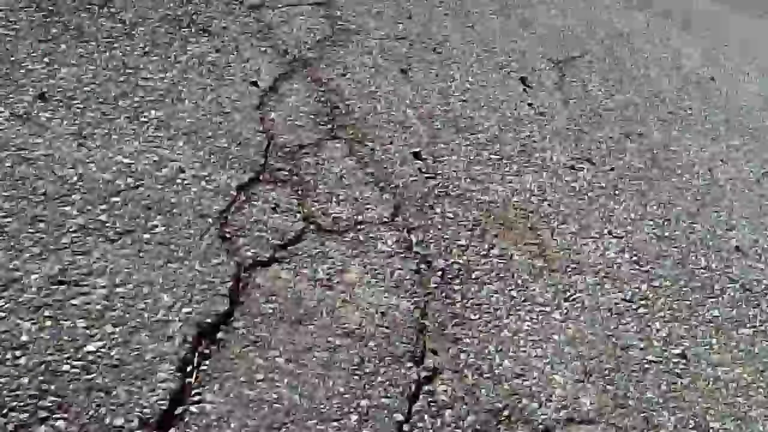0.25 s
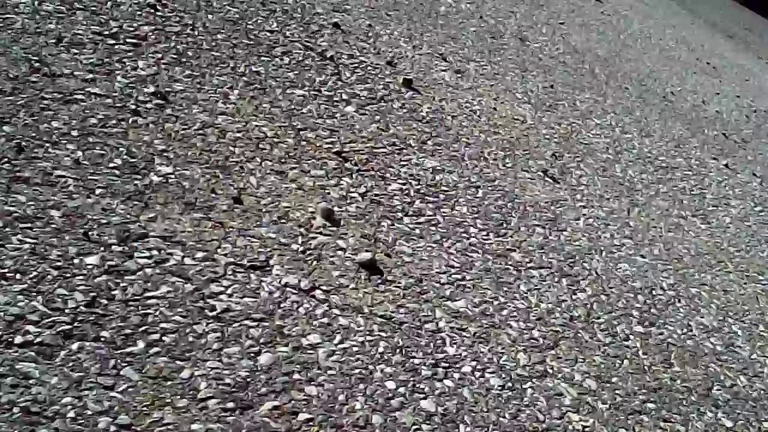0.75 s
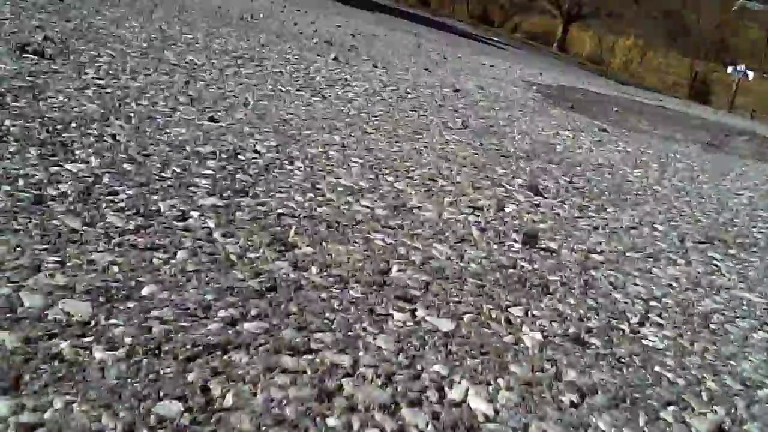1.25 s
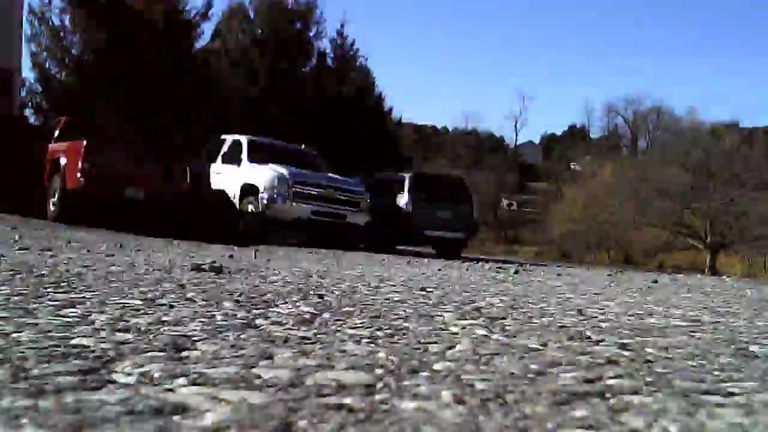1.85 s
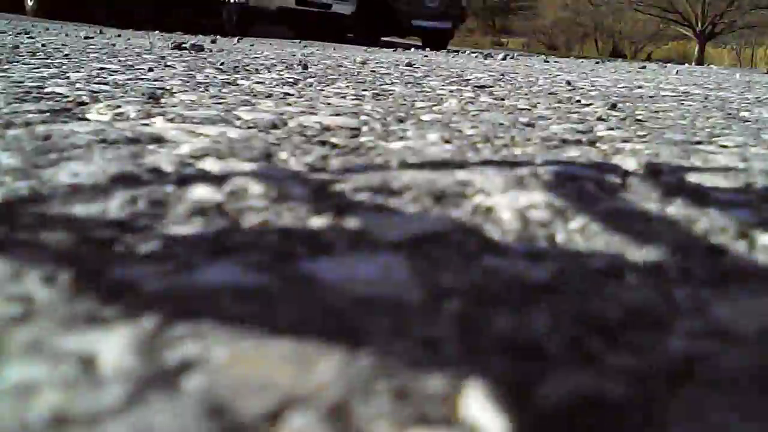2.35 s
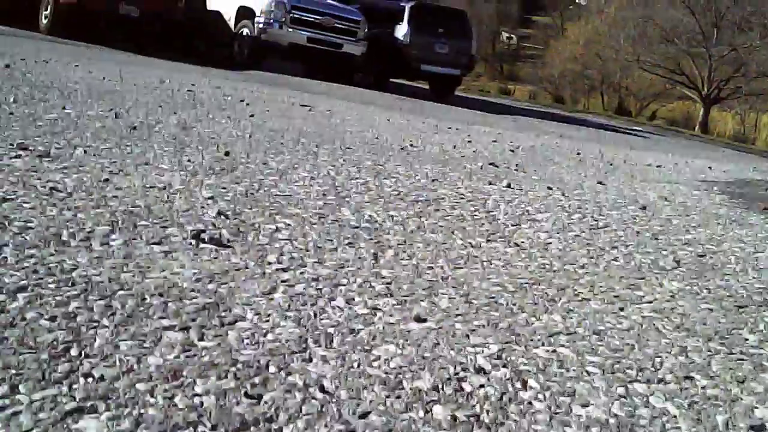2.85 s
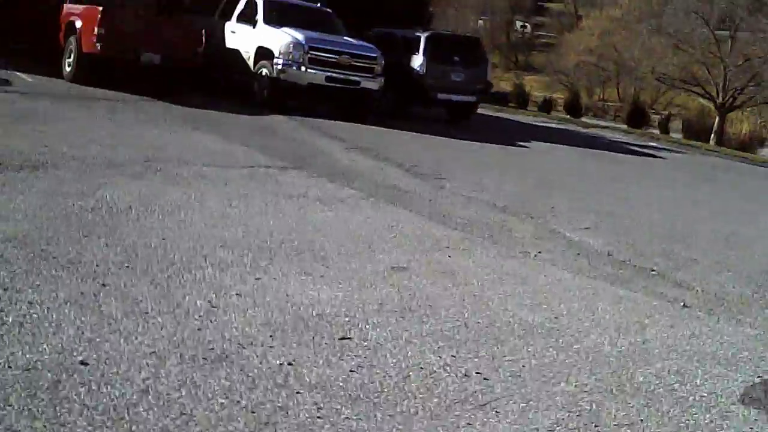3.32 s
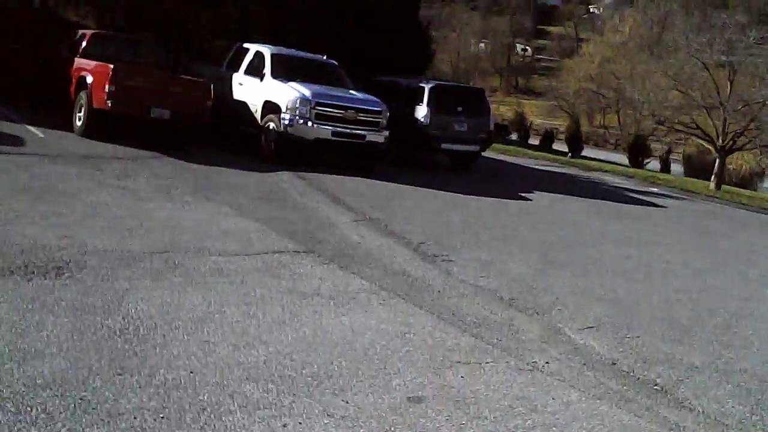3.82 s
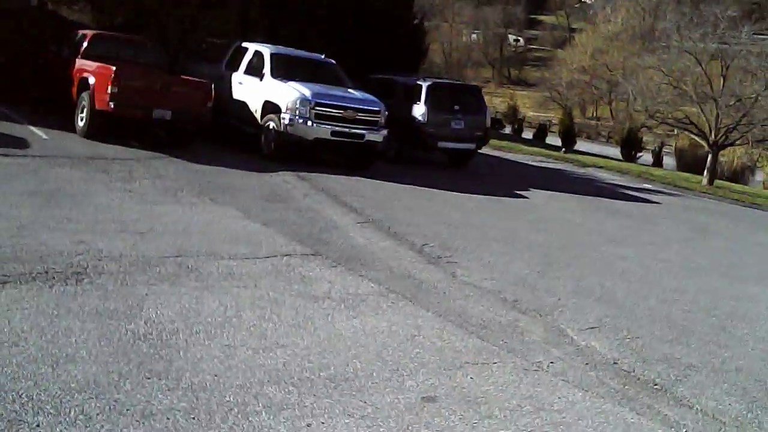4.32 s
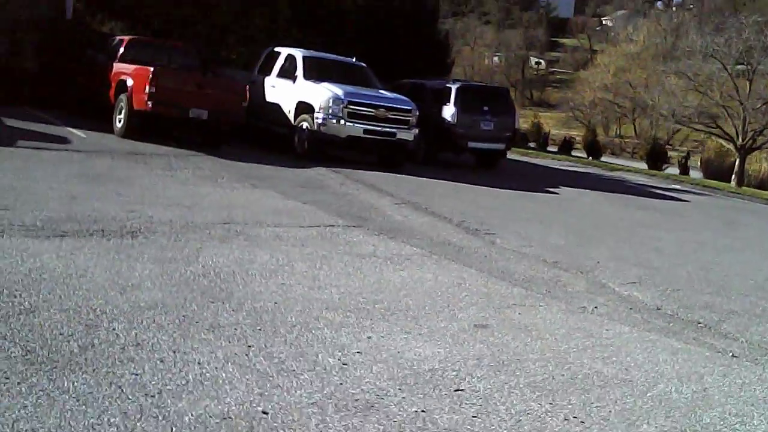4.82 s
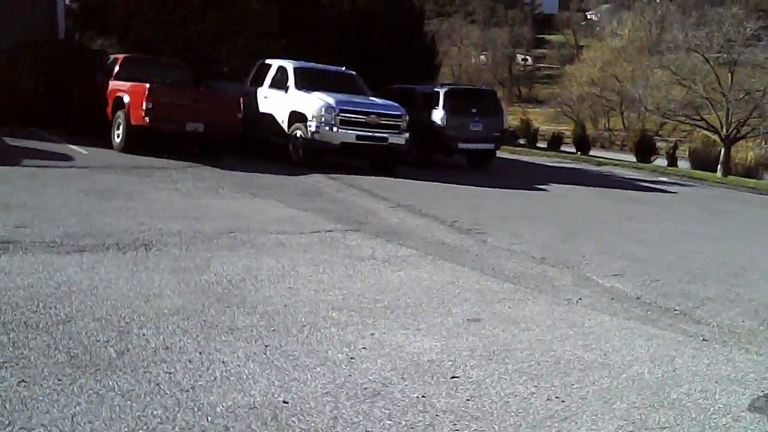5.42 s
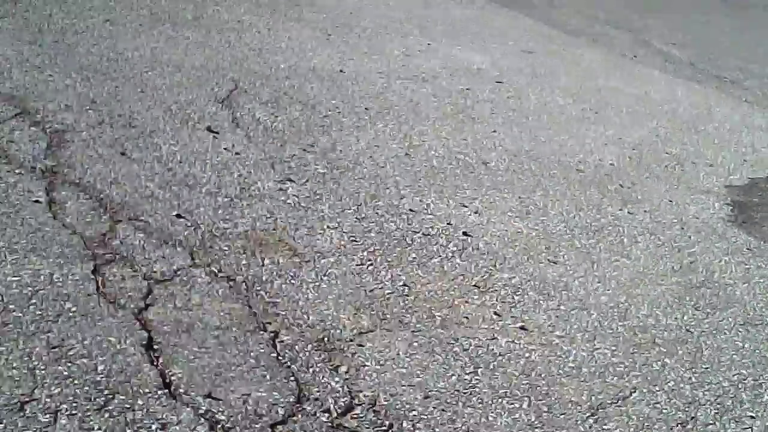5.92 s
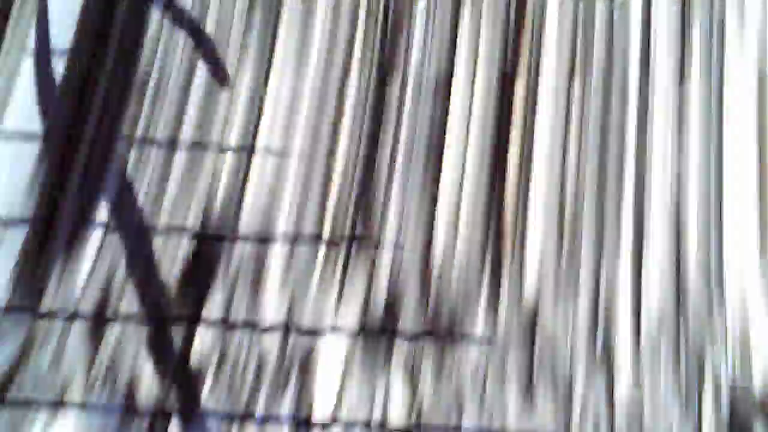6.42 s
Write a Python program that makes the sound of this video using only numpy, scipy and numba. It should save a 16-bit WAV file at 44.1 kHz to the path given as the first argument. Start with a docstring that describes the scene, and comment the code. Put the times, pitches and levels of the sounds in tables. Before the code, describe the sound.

Wind on the microphone, a small plastic drone skids on asphalt, then its motors spin up into a loud, wavering whine.

```python
"""Outdoors over asphalt, from the microphone of a camera riding on a small geared quadcopter.
It coasts with wind on the microphone and loose parts ticking, then skids and bounces on the ground.
The motors spin up at very close range: shaft tones, the whine of nine-tooth pinions, blade beats and
gear rattle shake the plastic frame and overload the microphone. Near the end it lands hard."""
import sys
import numpy as np
from scipy import signal
from scipy.io import wavfile
from scipy.ndimage import uniform_filter1d
from numba import njit

SR = 44100
rng = np.random.default_rng(int(sys.argv[2]) if len(sys.argv) > 2 else 0)


def generate_wav(sig):
    """Save sig (samples, or channels by samples) to the path in sys.argv[1] as 16-bit PCM at SR."""
    pcm = np.round(np.clip(np.atleast_2d(sig).T, -1, 1) * 32767).astype(np.int16)
    wavfile.write(sys.argv[1], SR, pcm)


N = 294147
TIME = np.arange(N) / SR


def undb(db):
    """Gain of a level in dB."""
    return 10 ** (np.asarray(db) / 20)


def unit(x):
    """Scaled to rms 1."""
    return x / np.sqrt(np.mean(x ** 2))


def curves(table, quiet_db=None):
    """Columns of a table at every sample; outside its span they hold, or take quiet_db."""
    times, *columns = np.transpose(table)
    return [np.interp(TIME, times, c, left=quiet_db, right=quiet_db) for c in columns]


@njit
def band(x, hz, width):
    """State-variable band-pass, gain 1 at the centre."""
    y, mid, low = np.empty(len(x)), 0., 0.
    g, damping = np.tan(np.pi * hz / SR), width / hz
    for i in range(len(x)):
        v = (mid + g * (x[i] + 1e-18 - low)) / (1 + g * (g + damping))
        mid, low, y[i] = 2 * v - mid, low + 2 * g * v, damping * v
    return y


def walk(rate):
    """Random levels held 1 / rate s and slewed twice; spread near 1."""
    hold = int(SR / rate)
    steps = np.repeat(rng.standard_normal(N // hold + 1), hold)
    return 1.3 * uniform_filter1d(uniform_filter1d(steps, hold), hold)[:N]


def under(x, knee, order):
    """Near 1 for x smaller than the knee, near 0 past it."""
    return 1 / (1 + (x / knee) ** order)


def burst(t60):
    """Noise that dies 60 dB in t60 seconds."""
    t = np.arange(SR // 4) / SR
    return rng.standard_normal(len(t)) * undb(-60 * t / t60)


def add(out, time, x):
    """Mix x into out from a time in seconds on."""
    start = int(time * SR)
    out[start:start + len(x)] += x[:N - start]


# Modes of the plastic frame that carries the microphone: (frequency [Hz], width [Hz], gain [dB])
FRAME_MODES = [(207.7, 17.3, 6.5), (310.5, 167, 5.5), (640, 850, -10), (1053, 326, -1), (1774, 1150, -9),
               (2583, 470, -2), (3210, 600, -14.5), (4425, 1020, -13.5)]

def frame(force, width_share=1.):
    """The frame rings with its steep-sided modes; neighbours swing in opposite phase."""
    return sum((-1) ** k * undb(db) * band(band(force, hz, width_share * width), hz, 2 * width)
               for k, (hz, width, db) in enumerate(FRAME_MODES))


# Wind right on the microphone: (time [s], level [dB])
WIND_LEVEL = [(0.0, -22.5), (0.356, -22.5), (1.124, -25.5), (1.36, -23.5), (2.2, -24), (2.9, -21.5),
              (3.7, -23.5), (6.2, -24.5), (6.4, -17.5), (6.67, -12.5)]
# Its spectrum: (frequency [Hz], relative density [dB])
WIND_SPECTRUM = [(12, -30), (20, 13), (38, -23.5), (54, 1.5), (378, -28), (408, -29.5), (999, -34.5),
                 (1230, -42.5), (1940, -41.5), (9000, -87), (11700, -110), (19800, -120)]

def wind():
    """Wind rumbles on the microphone in half-octave bands that gust together and flutter alone."""
    out, gust = 0, walk(5.4)
    hz_points, db_points = np.transpose(WIND_SPECTRUM)
    for hz in 22 * 2 ** np.arange(0, 9, .5):
        db = np.interp(np.log(hz), np.log(hz_points), db_points) + 1.36 * gust + .37 * walk(41)
        out += undb(db) * band(band(rng.standard_normal(N), hz, hz / 2), hz, hz / 2)
    return undb(curves(WIND_LEVEL)[0]) * unit(out)


def rustle(peak_s=1.265, spread_s=.037):
    """Just before touchdown a soft rasp swells and fades on the upper modes of the frame."""
    swell = np.exp(-((TIME - peak_s) / spread_s) ** 2)
    rasp = band(frame(rng.standard_normal(N), width_share=.33), 2300, 3000)
    return undb(-43 + 3.5 * walk(60)) * swell * unit(rasp)


# Faint ticks close by, while coasting: (time [s], relative level [dB], pitch [Hz])
LOOSE_TICKS = [(0.3543, -22, 1470), (0.5, -24, 1380), (0.5472, -27.5, 1730), (0.565, -22, 1720),
               (0.576, -25, 1780), (0.608, -26, 1820), (0.847, -30.5, 1910)]

def ticks():
    """Loose parts tick, each on its own pitch."""
    out = np.zeros(N)
    for time, db, hz in LOOSE_TICKS:
        add(out, time, undb(db + 17) * band(band(burst(.017), hz, .26 * hz), hz, .35 * hz))
    return out


# Asphalt contacts, heard through the frame:
# (time [s], relative crack level [dB], relative thud level [dB], chatter t60 [s])
CONTACTS = [(1.384, -5, 8.5, 0.062), (1.4, 4.5, 0, 0.11), (1.42, 1.5, -19, 0.061),
            (1.438, -4.5, -8.5, 0.082), (1.446, 2, -5.5, 0.11), (1.488, -23, -10.5, 0.093),
            (1.516, -5.5, -13, 0.19), (1.578, -5, -7.5, 0.06), (1.6, -32, -10.5, 0.097),
            (1.637, -3, -10, 0.061), (1.672, 2, -13, 0.11), (1.692, -0.5, -7, 0.12),
            (1.735, 1.5, -2, 0.084), (1.762, 0.5, -21, 0.1), (1.779, -2.5, -11, 0.076),
            (1.808, -3, -3.5, 0.055), (1.831, -10.5, -18.5, 0.14), (1.877, -0.5, -2.5, 0.076),
            (1.9, -4, -10, 0.11), (1.914, -4, -12, 0.081), (1.98, -6, -8.5, 0.081),
            (2.006, -3.5, -12.5, 0.051), (2.027, -3, -1.5, 0.085), (2.059, -7, -9, 0.14),
            (2.078, -14, -16.5, 0.12), (2.102, -2, -9, 0.09), (2.132, -7.5, -25, 0.078),
            (2.168, -15, -28, 0.061), (2.422, -7, -3.5, 0.04), (5.934, 5.5, -25, .078),
            (6.199, 5, -3.5, 0.065), (6.229, 4, -3, .11), (6.25, -2, -4.5, 0.076), (6.269, -5, -5, .06),
            (6.31, -9, -8.5, 0.074)]
# Grit under the skids: (time [s], relative level [dB])
SKID_GRIT = [(1.38, -46), (1.58, -24), (1.96, -28), (2.116, -49), (2.2, -53)]

def ground():
    """Each contact knocks the frame, chatters and shoves the microphone with a thud; grit scrapes."""
    crack, thud = np.zeros(N), np.zeros(N)
    for time, crack_db, thud_db, t60 in CONTACTS:
        chatter = burst(t60)
        n = len(chatter)
        chatter *= undb(2.64 * rng.standard_exponential(n)) * (rng.random(n) < 1200 / SR)
        chatter[0] = 2.74  # the first blow
        add(crack, time, undb(crack_db) * chatter)
        add(thud, time, undb(thud_db) * burst(.95 * t60))
    grit_db, = curves(SKID_GRIT, quiet_db=-120)
    grains = (rng.random(N) < 900 / SR) * rng.standard_normal(N)
    grains *= undb(9.4 * rng.standard_exponential(N))
    shove = undb(33) * band(band(thud, 66.3, 92), 40.6, 101)
    shove += undb(29) * band(band(thud, 136, 89), 151, 210)
    shove += undb(22) * band(band(thud, 263, 89), 208, 180)
    soft = signal.butter(2, 2000, fs=SR, output="sos")  # plastic on stone gives little treble
    blows = signal.sosfilt(soft, undb(12) * crack + undb(grit_db + 8) * unit(grains))
    battery_bay = undb(10) * band(band(blows, 1200, 150), 1540, 450)
    return battery_bay + frame(blows) + undb(2) * frame(blows, width_share=.51) + shove


# Rotor hiss at the microphone: (band centre [Hz], relative level [dB])
HISS_BANDS = [(3000, -5), (5500, 4), (8800, -6), (11000, -1)]

def air(rattle, shaft_hz, knee_hz=287):
    """The rotors hiss, more thinly below the knee speed."""
    hiss = sum(undb(db + .37 * walk(30)) * band(rattle, hz, .56 * hz) for hz, db in HISS_BANDS)
    return undb(-29.5 + 8 * np.minimum(np.log2(shaft_hz / knee_hz), 0)) * unit(hiss)


def downwash(rattle):
    """Downwash buffets the shell."""
    return undb(-12.5 + 1.8 * walk(12)) * unit(band(band(rattle, 156, 63), 144, 174))


def gear_noise(knocks, rattle, level_db, shake):
    """Gears clatter in the frame; the harder the shafts shake it, the more its loose shell buzzes."""
    highs = signal.butter(2, 600, "high", fs=SR, output="sos")
    gears = unit(frame(rattle)) + undb(-11) * unit(frame(signal.sosfilt(highs, knocks)))
    buzz = unit(signal.sosfilt(highs, frame(rattle, width_share=.27)))
    return undb(level_db) * gears + undb(-15 + 1.67 * walk(30)) * shake * buzz


def pinion(turn, blade, slack, level_db, teeth=9):
    """Meshing teeth give a whine and its octave; slack makes them rough and throbbing."""
    mesh = teeth * turn + (.25 + .7 * slack) * walk(200) + 1.3 * slack * np.sin(blade)
    octave = undb(level_db - 21 + walk(75)) * np.sin(2 * mesh + 6 * walk(300))
    return undb(level_db + 2.4 * walk(50)) * np.sin(mesh), octave


CRUISE_HZ, SLACK_HZ, IDLE_HZ, STALL_HZ = 480, 373, 171, 119  # shaft speeds
PULL_HZ_PER_S, COAST_HZ_PER_S = 1200, 1155
SHAFT_TURNS_PER_BLADE, HARD_LANDING_S = 3.1, 6.21

def motor(hz, share_db, tone_db, arm_hz, above_hz, below_hz, boost_db, cruise_db, db_per_octave):
    """One drive: the shaft shakes its arm, hardest at resonance, and a pinion turns the blades."""
    octaves = np.log2(hz / CRUISE_HZ)
    acceleration = uniform_filter1d(np.gradient(hz) * SR, size=SR // 40)
    pull = np.tanh(np.maximum(acceleration, 0) / PULL_HZ_PER_S)
    # in fast slowing the teeth float and the shaft shakes more
    coast = 1 / (1 + (COAST_HZ_PER_S / np.minimum(acceleration, -1)) ** 4)
    idle, stall = under(hz, IDLE_HZ, 8), under(hz, STALL_HZ, 8)
    slack = .05 + .8 * under(hz, SLACK_HZ, 6)
    off_peak = (hz - arm_hz) / np.where(hz < arm_hz, below_hz, above_hz)
    shake = undb(tone_db + boost_db * np.exp(-off_peak ** 2) - 9 * idle + 2.5 * (coast - pull))
    unloaded_db = cruise_db + db_per_octave * np.maximum(octaves, -.6)
    unloaded_db -= 5 * idle + 10 * (TIME > HARD_LANDING_S)
    whine_db = (1 - pull) * unloaded_db + pull * (share_db - 18) - 15 * coast - 5 * stall
    turn = 2 * np.pi * np.cumsum(hz * (1 + .003035 * walk(60))) / SR
    blade = turn / SHAFT_TURNS_PER_BLADE
    whine, whine_octave = pinion(turn, blade, slack, whine_db)
    shaft = shake * undb(2.8 * walk(25)) * np.sin(turn)
    shaft += undb(1.5 * share_db - 26.5) * band(np.sin(2 * turn), 1096, 84)
    beat = undb(share_db + 8.5 * octaves + 4.36 * walk(15)) * np.sin(blade + .65 * walk(30))
    # teeth and brushes knock once a shaft turn; slack bunches the rattle once a propeller turn
    knocks = undb(share_db + 11.2 * walk(200)) * np.exp(60 * (np.cos(turn) - 1))
    bunching = 1 - .61 * slack + .8 * slack * np.exp(11.4 * (np.cos(blade / 2) - 1))
    rattle = undb(share_db) * bunching * rng.standard_normal(N)
    return shaft + whine_octave, whine, beat, knocks, rattle, shake


# The three motors the microphone picks up: (time [s], shaft speed [Hz])
SHAFT_SPEED_1 = [(2.42, 80), (2.45, 112.6), (2.52, 297.6), (2.6, 458.6), (2.65, 500.7), (2.7, 502),
                 (2.8, 531.5), (3.03, 538.5), (3.17, 462), (3.32, 432.6), (3.5, 475.2), (3.67, 491.7),
                 (3.75, 465.3), (3.86, 366.8), (4.38, 351.6), (4.52, 460.4), (4.6, 473.6), (4.7, 515.3),
                 (4.78, 510.4), (4.85, 517.7), (4.92, 501.6), (4.99, 510.2), (5.2, 473.8), (5.26, 492.3),
                 (5.35, 509.7), (5.41, 477), (5.55, 279.9), (5.7, 189.3), (5.93, 115.5), (5.97, 154.5),
                 (6.05, 353.8), (6.08, 467.7), (6.13, 514.8), (6.165, 505.2), (6.2, 520.4), (6.24, 442.2),
                 (6.3, 501.4), (6.39, 549.6), (6.52, 526.5), (6.67, 549.7)]
SHAFT_SPEED_2 = [(2.42, 59.77), (2.491, 121.3), (2.52, 245.7), (2.601, 387), (2.68, 448.4), (2.851, 499.6),
                 (3.02, 497.2), (3.199, 407.2), (3.419, 409.8), (3.68, 456.2), (3.84, 362.6), (3.93, 322.4),
                 (4.2, 302.8), (4.35, 316.1), (4.43, 333.5), (4.58, 437.6), (4.7, 475), (4.85, 478),
                 (5.0, 447.2), (5.2, 445.6), (5.331, 460.7), (5.46, 357.8), (5.55, 271.6), (5.65, 199.6),
                 (5.7, 171.2), (5.92, 119.3), (5.95, 190.6), (5.98, 252.7), (6.1, 398), (6.27, 351.3),
                 (6.33, 366.4), (6.39, 439), (6.441, 499), (6.48, 524.7), (6.67, 518)]
SHAFT_SPEED_3 = [(2.42, 50.3), (2.48, 110.9), (2.54, 260.8), (2.64, 369.4), (2.78, 428.5), (3.0, 449.3),
                 (3.22, 378), (3.4, 377.7), (3.548, 409.8), (3.7, 419.6), (3.8, 335.8), (3.9, 299),
                 (4.38, 270.4), (4.45, 289.8), (4.62, 398.8), (4.95, 459.3), (5.3, 423.4), (5.42, 305.4),
                 (5.8, 282), (5.86, 170), (5.96, 129.9), (6.06, 290), (6.3, 343), (6.36, 359.4),
                 (6.485, 235.3), (6.56, 465.5), (6.67, 522)]
# Their voices: (share [dB], shaft tone [dB], arm resonance [Hz], width above [Hz], width below [Hz],
# arm boost [dB], whine at cruise [dB], whine slope [dB/octave])
MOTOR_VOICES = [(0.5, -25, 420, 47, 63, 6.5, -19, 17.5), (-2.5, -32, 320, 104, 260, 20.5, -26, 17),
                (-4.5, -34.5, 371.4, 23, 59, 18.5, -27, 3.5)]
# All rotors together, close up: (time [s], gear rattle level [dB], blade beat level [dB])
ROTOR_LEVELS = [(2.42, -14.5, -23), (2.48, -8.5, -16), (2.62, -17.5, -16.5), (3.0, -16, -20),
                (3.37, -13, -22), (3.64, -21, -27.5), (3.77, -13, -21.5), (4.17, -12.5, -28),
                (4.65, -16.5, -18), (5.0, -18.5, -24), (5.29, -20.5, -23), (5.46, -12, -25.5),
                (5.7, -11.5, -21), (5.92, -13, -18), (5.98, -12.5, -25), (6.16, -15.5, -17.5),
                (6.67, -11.5, -17)]

def rotors():
    """The motors start together and sound through the one frame; their whine rings its modes."""
    rattle_db, blade_db = curves(ROTOR_LEVELS)
    speeds = [curves(table)[0] for table in (SHAFT_SPEED_1, SHAFT_SPEED_2, SHAFT_SPEED_3)]
    drives = [motor(hz, *voice) for hz, voice in zip(speeds, MOTOR_VOICES)]
    tones, whine, beat, knocks, rattle, shake = np.sum(drives, axis=0)
    whine -= .9 * band(whine, 3780, 900)  # the frame lies still between its two top modes
    tones += undb(14) * frame(whine, width_share=.7)
    noise = gear_noise(knocks, rattle, rattle_db, shake) + air(rattle, speeds[0])
    noise += undb(rattle_db) * downwash(rattle)
    running = np.clip((TIME - SHAFT_SPEED_1[0][0]) / .0052, 0, 1)
    return running * (np.sqrt(2) * tones + undb(blade_db) * beat + noise)


def scene():
    """One microphone on the frame, in open air with no echo, over faint preamp hiss."""
    return (rotors() + ground() + ticks() + rustle() + wind() + undb(-59.5) * rng.standard_normal(N))[None]


def record(dry, clip_level=.7, rolloff_hz=5650, top_hz=12600):
    """The preamp clips with a short knee, the treble rolls off and the top is cut."""
    clipped = dry / (1 + np.abs(dry / clip_level) ** 8) ** (1 / 8)
    dull = signal.sosfilt(signal.butter(1, rolloff_hz, fs=SR, output="sos"), clipped)
    return signal.sosfilt(signal.cheby2(10, 60, top_hz, fs=SR, output="sos"), dull)


dry = scene()
out = record(dry)
generate_wav(out)
```